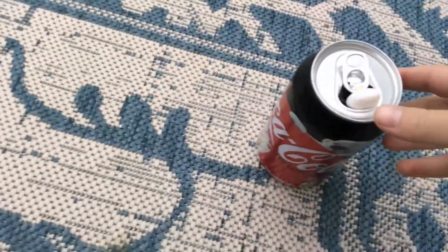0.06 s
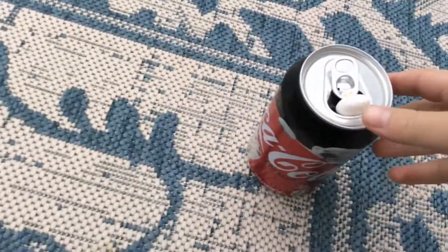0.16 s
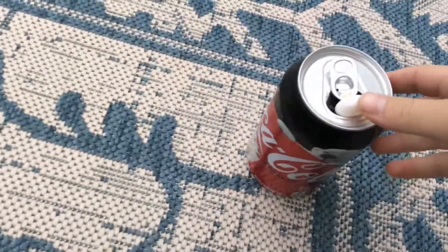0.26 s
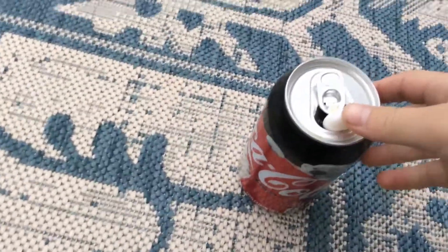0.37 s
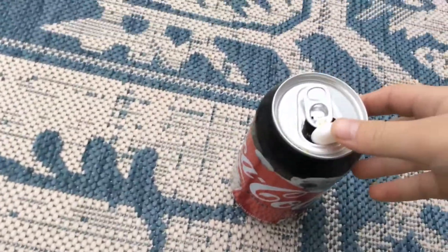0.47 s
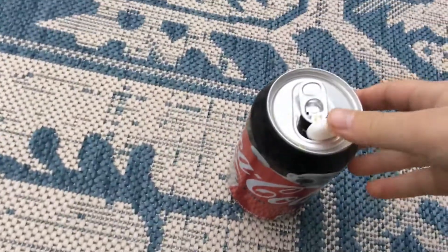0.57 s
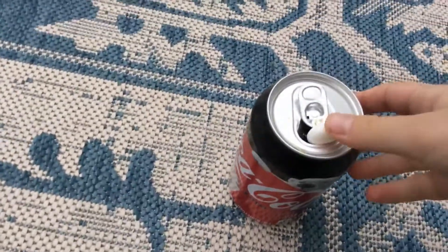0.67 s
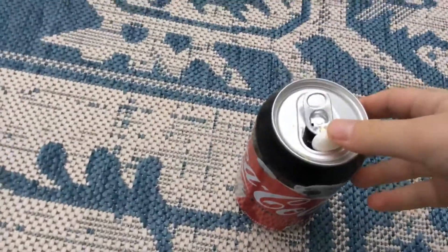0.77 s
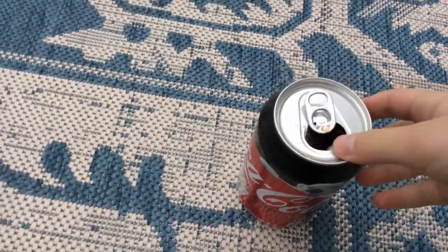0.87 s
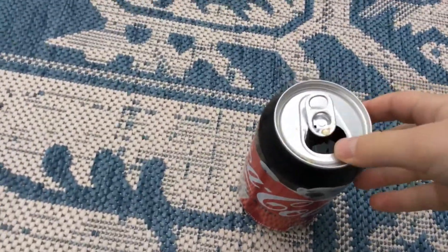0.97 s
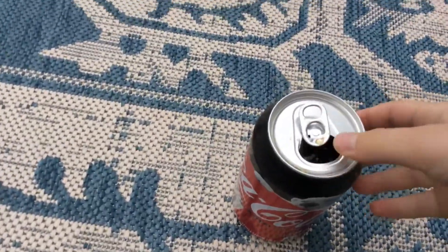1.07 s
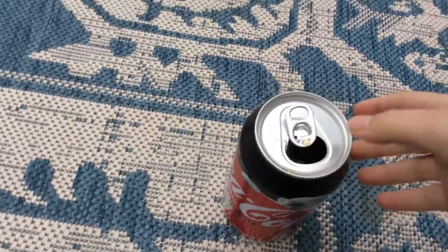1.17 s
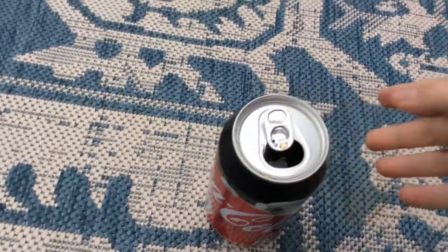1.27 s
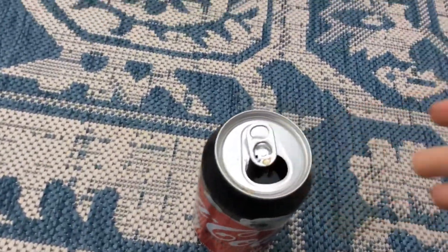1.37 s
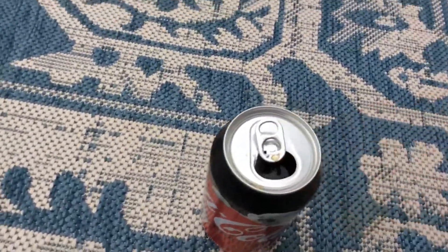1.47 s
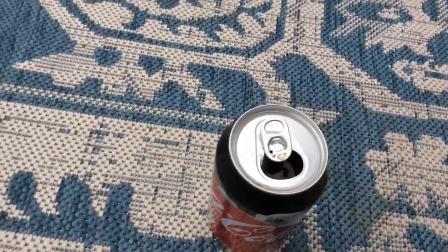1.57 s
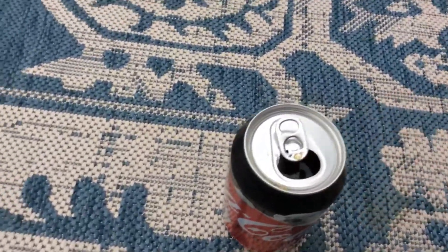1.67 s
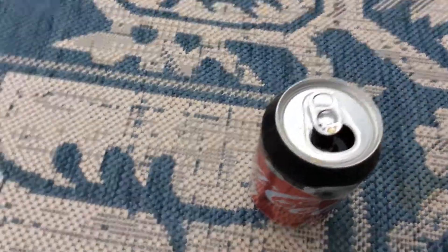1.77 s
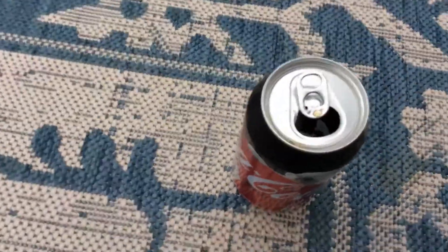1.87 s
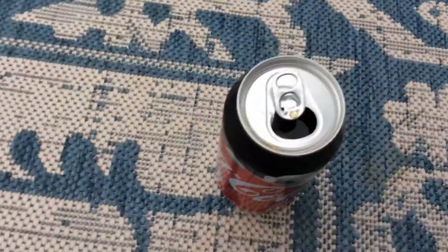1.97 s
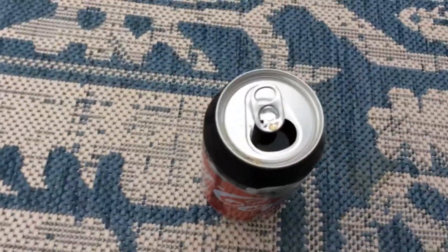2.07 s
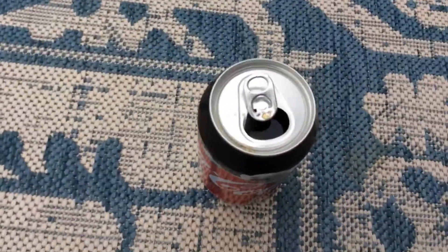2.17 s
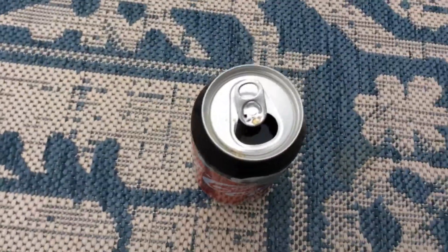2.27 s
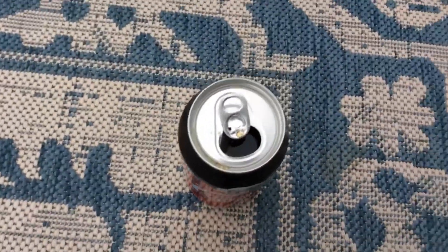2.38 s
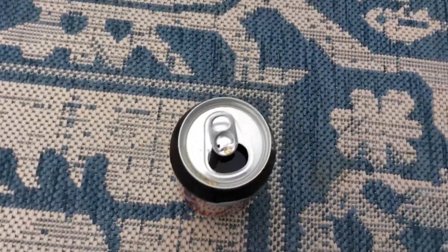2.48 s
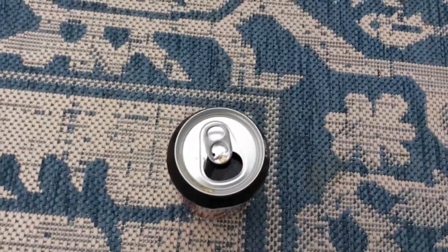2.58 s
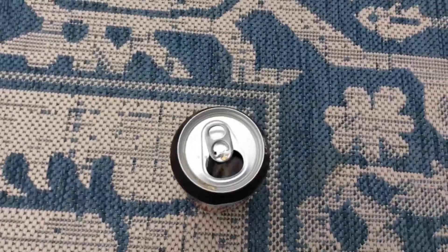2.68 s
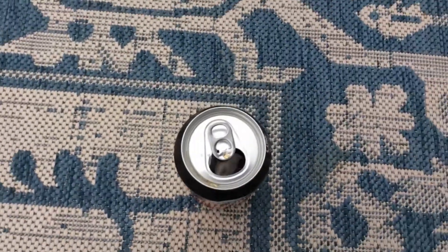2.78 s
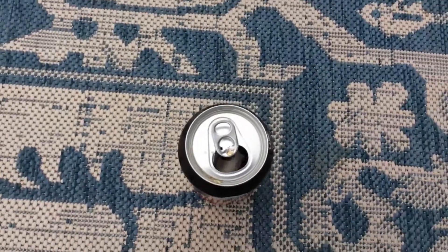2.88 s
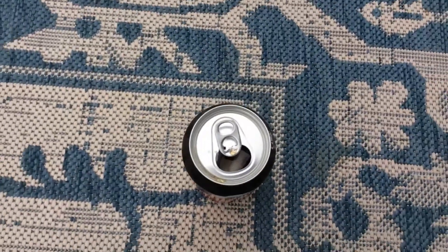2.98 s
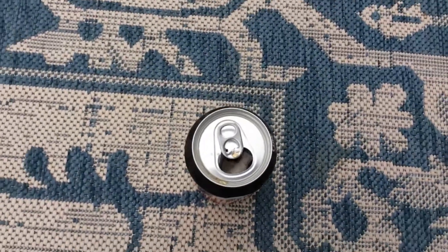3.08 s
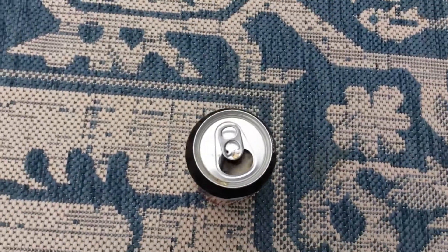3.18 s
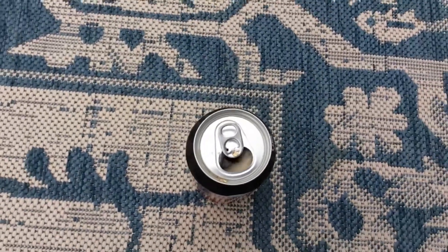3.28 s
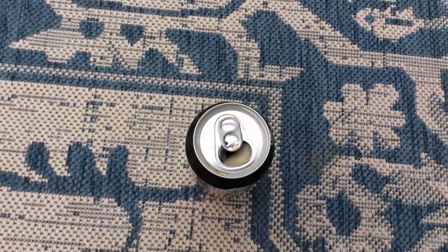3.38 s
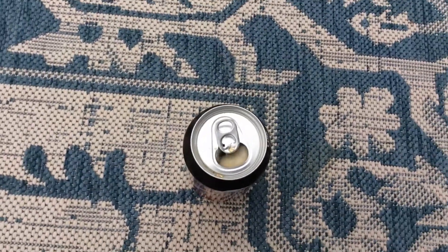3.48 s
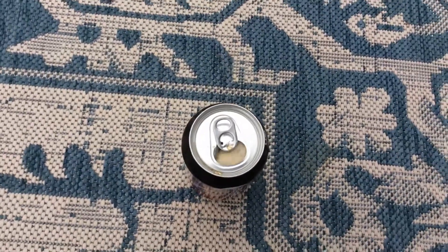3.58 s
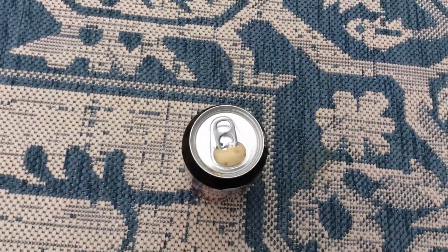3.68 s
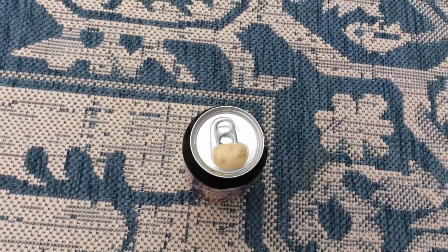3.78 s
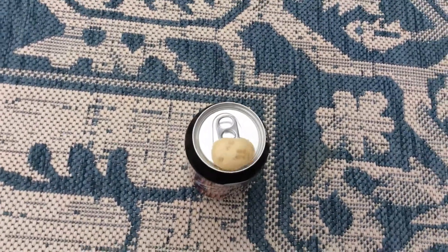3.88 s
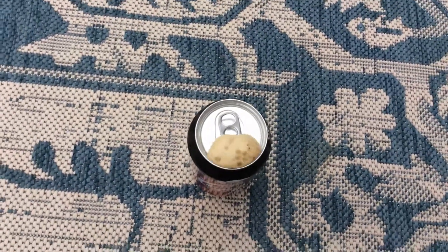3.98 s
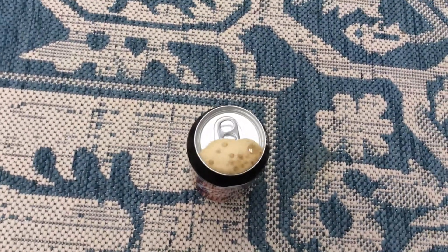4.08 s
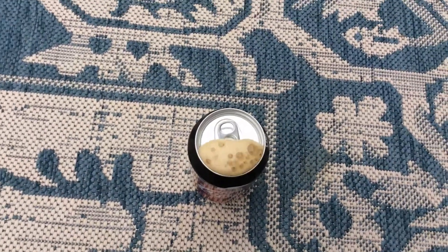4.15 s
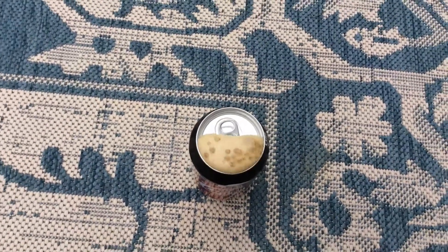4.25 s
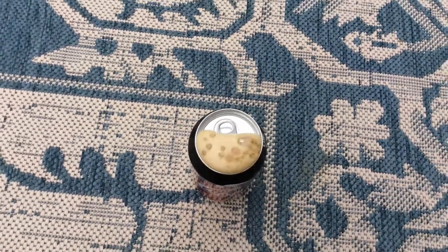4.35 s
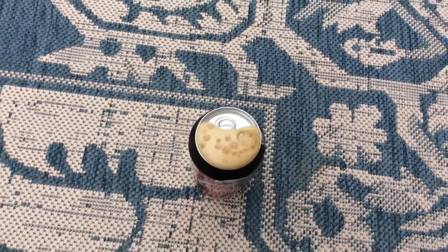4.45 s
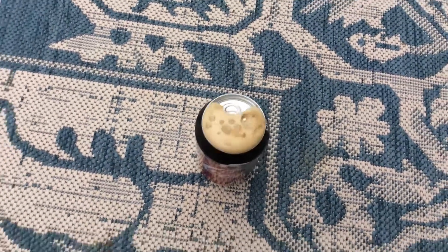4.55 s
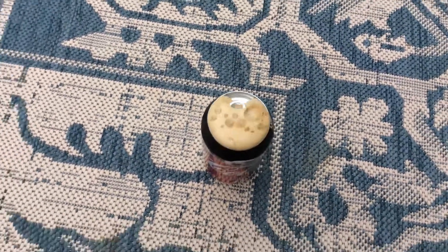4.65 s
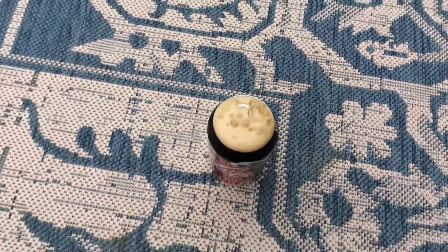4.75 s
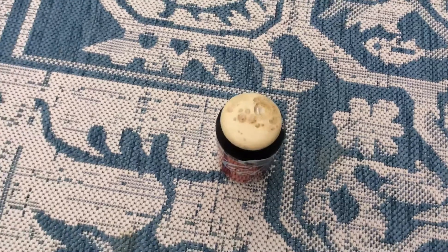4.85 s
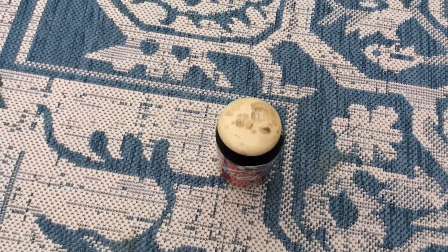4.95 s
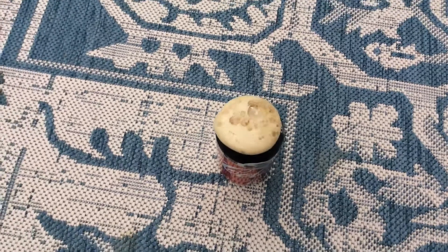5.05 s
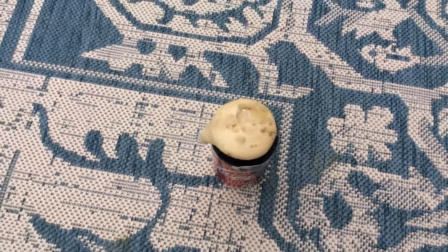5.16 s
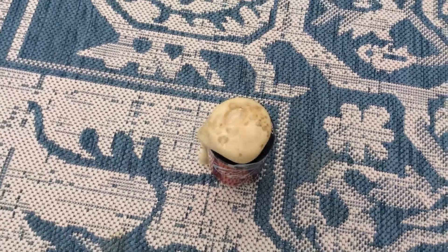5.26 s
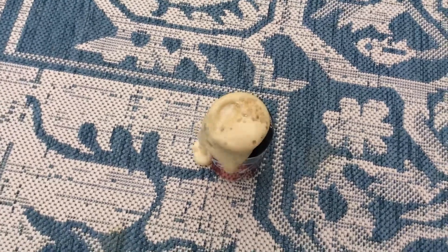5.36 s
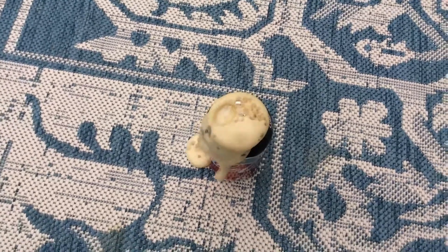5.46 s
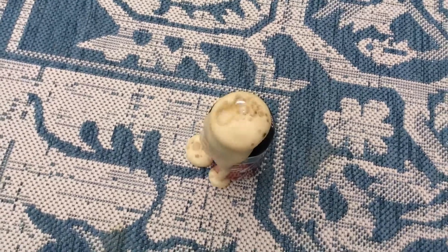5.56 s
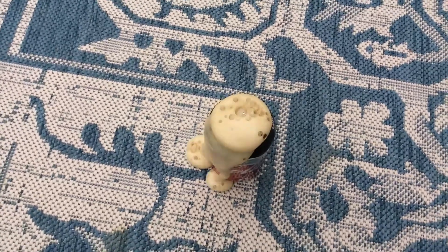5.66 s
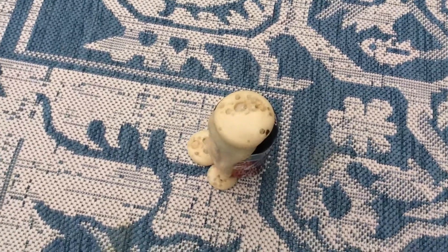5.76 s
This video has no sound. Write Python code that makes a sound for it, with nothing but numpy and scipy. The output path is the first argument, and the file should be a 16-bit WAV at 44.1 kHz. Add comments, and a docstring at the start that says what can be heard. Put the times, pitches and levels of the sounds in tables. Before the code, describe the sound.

Close mono pickup outdoors: low distant rumble with a faint hum, then a very brief scrape and bright aluminium crack, with a small splash and hollow plops. Two clear knocks and weaker bounces sound inside the filled can. A weak gush of tiny bubbles becomes dense crackling fizz, momentarily muffled, then open and strongest at the end. Soft rustles, bumps and a tiny bird chirp sit behind.

```python
"""A mint is pushed by thumb through the opening of a soda can: it scrapes, snaps past the lid and drops in.
Close by, it lands with a splash and plops, taps on the bottom; fizz builds in the can, then foam climbs out, hissing.
Cracks, taps and bumps are coloured bursts, with decaying sines for the can; the fizz is thousands of tiny pops.
Outdoors behind it: distant rumble and air, a faint hum and soft rustles, all shaped noise, soft low bumps,
and one bird chirp, a gliding sine. One microphone hears it all, through gain control and a band limit."""
import sys
import numpy as np
from scipy import signal
from scipy.fft import rfft, irfft
from scipy.io import wavfile
from scipy.ndimage import uniform_filter1d

SR = 44100
rng = np.random.default_rng(int(sys.argv[2]) if len(sys.argv) > 2 else 0)


def dump(signal):
    """Clip the signal to [-1, 1] and save it as 16-bit WAV at the path in sys.argv[1]."""
    limited = np.clip(np.atleast_2d(signal).T, -1, 1)
    pcm = np.round(limited * 32767).astype(np.int16)
    wavfile.write(sys.argv[1], SR, pcm)


N = 256838
TIME = np.arange(N) / SR  # seconds

# outdoor air, spectral shape: pitch_hz, density_db (relative, per Hz)
AIR_SHAPE = [(20, -26), (40, -10.5), (62, 1.5), (110, 0.5), (180, -1), (260, -10), (450, -19), (1050, -21),
             (1800, -26.5), (2800, -28.5), (4000, -26.5), (4800, -29), (7700, -31.5), (8250, -26),
             (10000, -36), (15500, -45)]
# swells of the distant rumble: peak_s, half_length_s, gain_db
RUMBLE_SWELLS = [(.23, 0.45, 4), (1.95, .12, 1.5), (2.497, 0.22, 4), (3.55, .18, 2), (5.582, 0.046, 5.5)]
# lines of a far machine's hum: pitch_hz, width_hz
HUM_LINES = [(169, 9), (619, 10), (727, 9), (1028, 22), (1238, 14)]
# level of each hum line before the swell: level_db
HUM_LINE_LEVELS = [-65.5, -83.5, -81, -79, -85.5]
# rise and fall of the whole hum: time_s, gain_db
HUM_SWELL_CURVE = [(0, -2.5), (1.5, -5.5), (2.4, 5), (4.4, 2.5), (5.8, -0.5)]
# brief rustles and spurts: start_s, length_s, level_db, centre_hz, width_octaves
RUSTLE_EVENTS = [(0.349, 0.15, -65.5, 3970, 0.17), (0.499, 0.02, -64, 5930, 0.18),
                 (2.21, 0.073, -59.5, 7940, 0.53), (2.81, 0.037, -62.5, 7900, 0.17),
                 (3.617, 0.053, -58, 8200, .25)]
# soft low bumps, the first three are dull thumps of the bottom taps:
# start_s, level_db, body_hz, width_octaves, t60_s
BUMP_EVENTS = [(1.414, -41.5, 540, 0.41, 0.028), (1.516, -50, 650, 0.54, .03), (1.586, -54.5, 520, .7, .04),
               (1.892, -52, 300, 1.03, 0.14), (2.227, -47, 700, 0.93, 0.023),
               (2.383, -51.5, 560, 0.32, .04), (2.426, -52.5, 520, 0.44, .035),
               (2.484, -52, 540, 0.51, 0.042), (2.905, -54, 1700, 1.5, 0.017),
               (5.356, -48, 600, 1.8, 0.027)]
# tiny high ticks: start_s, level_db, ring_hz, width_hz
TICK_EVENTS = [(0.896, -58.5, 7800, 2190), (1.053, -39, 9900, 1500), (1.0572, -42, 7000, 1500),
               (1.299, -50, 8130, 1390)]
# the mint slips past the rim and falls in, the last row is the landing's splash:
# start_s, level_db, brightness_db_per_octave, crack_t60_s
SLIP_EVENTS = [(0.9481, -29, 1.5, .035), (0.953, -26.5, -1, .03), (0.958, -17.5, 3.5, .02),
               (.9629, -9, 1.5, 0.017), (.966, -7.5, 3.5, 0.019), (.969, -19.5, 4, 0.016),
               (.9722, -17, -3.5, 0.026), (.982, -29, -2.5, 0.044), (.9965, -49, 4, .03),
               (1.0237, -33, -1, 0.063)]
# spectrum of the cracks and the splash: pitch_hz, level_db (relative)
CRACK_SHAPE = [(300, -48), (550, -35.5), (650, -22.5), (950, -13.5), (1200, -5.5), (2000, -6), (2800, -7),
               (4500, -7.5), (6800, -1.5), (8600, -3.5), (9300, -12.5), (11000, -10.5), (11600, -18),
               (15500, -26)]
# modes of the aluminium lid: pitch_hz, level_db (relative), t60_s
LID_MODES = [(1227, -12, 0.038), (1475, -4.5, 0.12), (1550, -1.5, 0.065), (1656, -9, 0.12),
             (1904, -4.5, .06), (2020, 2, 0.099), (2090, -5.5, 0.05), (2510, -4.5, 0.057),
             (3920, -9.5, 0.053), (4580, -12, 0.08), (5120, -14.5, 0.07), (5860, -2, 0.056),
             (6220, -6, .04), (6690, -0.5, .05), (6930, 6.5, 0.032), (7860, -6.5, .05), (7990, -2.5, 0.043),
             (8560, -5, .05), (8510, -6, .05), (8950, 1.5, 0.029), (9700, -11.5, .04), (10700, -6, 0.032)]
# the snap, then the landing, set the can's air ringing: start_s, level_db
AIR_PUFFS = [(0.9727, -35.5), (1.0245, -31.5)]
# modes of the air in the can: pitch_hz, level_db (relative), t60_s
CAN_AIR_MODES = [(1023, -23, 0.171), (1195, -14.5, .3), (1294, -7.5, 0.16), (1387, -8.5, 0.092),
                 (1506, -5.5, 0.15), (1525, -10, 0.14), (1638, -9, 0.13)]
# pockets of air dragged under by the mint: start_s, level_db, pitch_hz, t60_s
PLOP_EVENTS = [(1.0265, -24, 1550, 0.027), (1.034, -21.5, 1320, 0.027), (1.052, -32, 1284, 0.055),
               (1.113, -50, 1215, 0.23)]
# the sunken mint bounces on the bottom: start_s, level_db, t60_s, low_band_hz, low_boost_db,
# high_band_hz, high_boost_db, brightness_db_per_octave
BOUNCE_EVENTS = [(1.408, -27, 0.034, 1344, 5.5, 8550, 13, 0),
                 (1.464, -25.5, 0.022, 3140, 16, 6320, 12.5, 0.4),
                 (1.5078, -43, .02, 2900, 8, 6000, 7, 5.5),
                 (1.5143, -36.5, 0.037, 1430, 5, 7700, 10.5, -0.5),
                 (1.559, -47.5, 0.034, 2900, 5, 4320, 1, -1.5), (1.584, -55, 0.033, 1300, 4, 2900, -3, -8)]
# spectrum of a knock on the bottom: pitch_hz, level_db (relative)
KNOCK_SHAPE = [(200, -31), (500, -25), (830, -9), (1100, -2), (1600, 0.5), (2400, 0.5), (3700, -10.5),
               (5000, -14), (6000, -11.5), (7800, -15), (9500, -20), (10600, -12.5), (12000, -23),
               (15500, -26)]
# modes of the filled can's body: pitch_hz, level_db (relative), t60_s
BODY_MODES = [(976, -5.5, 0.075), (1223, -4.5, 0.08), (1295, -4, 0.083), (1495, -5.5, 0.085),
              (1820, -22, 0.048), (2450, -15, 0.05), (2840, -20, 0.052), (3200, -17, 0.054),
              (3380, -10, 0.039), (4030, -10, .04), (4780, -12, 0.051), (5500, -19, 0.049),
              (5800, -10, 0.03), (6740, -25, .05), (7460, -11, 0.046), (8059, -14, 0.045),
              (8260, -18, 0.058), (10700, -18, 0.029)]
# how far the foam is out of the can: time_s, share_0_to_1
FOAM_OUT = [(3.0, 0), (3.6, 0.23), (3.95, 0.24), (4.5, 0.75), (5.3, 0.9), (5.8, 0.81)]
# the first tiny bubbles give way to larger ones: time_s, share_0_to_1
BUBBLE_COARSENING = [(2.4, 0), (3.15, 0.62)]
# spectrum of the first tiny bubbles: pitch_hz, level_db (relative)
FIRST_BUBBLE_SHAPE = [(2000, -26), (3200, -18), (5000, 0), (8500, 6), (10500, 4), (13000, -3), (15500, -8)]
# spectrum of the fizz inside the can: pitch_hz, level_db (relative)
IN_CAN_SHAPE = [(700, -36), (1500, 0.5), (2050, -5), (2650, 5.5), (4700, -2.5), (7500, 0), (8700, 2.5),
                (9800, 0.5), (10700, -11), (12500, -15), (15500, -22)]
# spectrum of the foam in the open: pitch_hz, level_db (relative)
OPEN_FOAM_SHAPE = [(700, -28), (1500, -14), (2050, -19), (2700, -4), (4000, -1.5), (5600, 0.5), (7600, -2),
                   (9200, -3.5), (10500, -9), (12000, -14.5), (15500, -18)]
# resonances of the can top: pitch_hz, width_hz, boost_db
CAN_TOP_PEAKS = [(4050, 370, 4.5), (5510, 640, 4), (6920, 240, 4), (8200, 390, 3)]
# gain of the low part of the hiss, falling, then partly recovering: time_s, gain_db
LOW_HISS_GAIN = [(3.3, 4.5), (3.9, -0.5), (4.4, -1), (5.0, 0.5), (5.8, -0.5)]

# the rumble slowly ebbs and wavers by chance
RUMBLE_DB, RUMBLE_DB_PER_S, WAVER_DB, WAVER_S = -56.5, -0.47, 1.1, 0.14
AIR_DB = -61
PLOP_RISE_S = 0.0018
POPS_PER_S = 14000  # scaled by 0.15 to 1.15 as the fizz grows
# the fizz builds along an S-curve: its ceiling, time of half strength, time constant
FULL_DB, HALF_S, BUILD_S = -50, 3.534, 0.56
# a first weak gush of gas peaks soon after the mint first taps the bottom
GUSH_S, GUSH_DB, GUSH_LENGTH_S = 1.66, -71.5, 0.44
# foam plugs the opening and muffles the hiss until it pushes through
PLUG_S, PLUG_DB, PLUG_CLOSE_S, PLUG_CLEAR_S = 3.705, -6, 0.082, 0.19
# foam spills over the rim and its bursting surface grows
SPILL_S, SPILL_DB_PER_S = 5.2, 4.5
# the bird's note rises fast and levels off towards its top pitch
CHIRP_S, CHIRP_LENGTH_S, CHIRP_DB = 3.534, 0.048, -51
CHIRP_FROM_HZ, CHIRP_TOP_HZ, CHIRP_GLIDE_S = 5600, 7700, 0.018
# gain control: threshold, dB of ducking per dB over it, recovery, smoothing time
DUCK_ABOVE_DB, DUCK_SLOPE, RECOVER_DB_PER_S, DUCK_ATTACK_S = -25, 0.2, 12, 0.07
EDGE_HZ = 15750  # upper band limit


def amp(db):
    """Turns dB into gain."""
    return 10 ** (np.asarray(db) / 20)


def unit(x):
    """Scales to rms 1."""
    return x / np.sqrt(np.mean(x ** 2) + 1e-24)


def curve(rows):
    """Joins rows of time_s, value by straight lines."""
    return np.interp(TIME, *np.transpose(rows))


def spectrum(points, hz):
    """Joins points of pitch_hz, level_db on a log-frequency axis."""
    point_hz, db = np.transpose(points)
    return np.interp(np.log(hz + 1), np.log(point_hz), db)


def bins(x):
    """Gives the frequencies of a sound's spectrum, in Hz."""
    return np.fft.rfftfreq(len(x), 1 / SR)


def hump(hz, centre, width):
    """A resonance curve of height 1."""
    return 1 / (1 + (2 * (hz - centre) / width) ** 2)


def bell(hz, centre_hz, octaves):
    """A soft band, in dB."""
    return -20 * np.log10(1 + (np.log2((hz + 1) / centre_hz) / octaves) ** 2)


def swell(s, rise, fall):
    """A smooth bump of height 1 that peaks at time s."""
    return np.exp(-((TIME - s) / np.where(TIME < s, rise, fall)) ** 2)


def colour(x, db):
    """Filters by a gain in dB for each frequency, then scales to rms 1."""
    return unit(irfft(rfft(x) * amp(db), len(x)))


def add(mix, s, sound):
    """Mixes a sound in at time s."""
    part = mix[max(round(s * SR), 0):][:len(sound)]
    part += sound[:len(part)]


def ring(modes, t):
    """Sums the damped sines of one struck object, with alternating sign."""
    total = 0
    for k, (hz, db, t60) in enumerate(modes):
        total = total + (-1) ** k * amp(db - 60 * t / t60) * np.sin(2 * np.pi * hz * t)
    return total


def burst(shape, t60, tail_db, tail_t60, click, size=8192):
    """A contact click, a dense dying cloud and a weak tail of reflections, in a causal colour (Hz -> dB)."""
    t, hz = np.arange(size) / SR, np.fft.rfftfreq(size, 1 / SR)
    gain = unit(amp(shape(hz)))
    # minimum phase, so that nothing sounds before the contact
    log_gain = np.log(np.r_[gain, gain[-2:0:-1]] + 1e-5)
    response = np.exp(np.conj(signal.hilbert(log_gain)))[:len(hz)]
    decay = amp(-60 * t / t60) + amp(tail_db - 60 * t / tail_t60)
    cloud = rng.choice([-1., 1.], size) * decay
    rms = cloud.std()
    cloud[0] = click * np.linalg.norm(cloud)
    return rms * unit(irfft(rfft(cloud) * response, size))


def rumble_level():
    """The distant rumble's level in dB: a slow ebb, a few swells and a random waver."""
    waver = colour(rng.standard_normal(N), -40 * np.log10(1 + (bins(TIME) * WAVER_S) ** 2))
    swells = sum(db * swell(s, length, length) for s, length, db in RUMBLE_SWELLS)
    return RUMBLE_DB + RUMBLE_DB_PER_S * TIME + swells + WAVER_DB * waver


def outdoors(split_hz=260):
    """Far rumble below steady air, both shaped noise; narrow noise lines make the wavering machine hum."""
    hz = bins(TIME)
    air_db, low_share = spectrum(AIR_SHAPE, hz), 1 / (1 + (hz / split_hz) ** 8)
    rumble = colour(rng.standard_normal(N), air_db + 10 * np.log10(low_share + 1e-12))
    air = colour(rng.standard_normal(N), air_db + 10 * np.log10(1 - low_share + 1e-12))
    hum = np.zeros(N)
    for (centre, width), db in zip(HUM_LINES, HUM_LINE_LEVELS):
        line_db = 20 * np.log10(hump(hz, centre, width))
        hum += amp(db) * colour(rng.standard_normal(N), line_db)
    return rumble * amp(rumble_level()) + amp(AIR_DB) * air + hum * amp(curve(HUM_SWELL_CURVE))


def rustles():
    """Short soft noise bands that swell and fade."""
    out = np.zeros(N)
    for s, length, db, centre_hz, octaves in RUSTLE_EVENTS:
        noise = rng.standard_normal(SR // 4)
        noise = colour(noise, bell(bins(noise), centre_hz, octaves))[:int(length * SR)]
        add(out, s, amp(db) * noise * np.hanning(len(noise)))
    return out


def ticks():
    """Small clicks, each with one high resonance."""
    out = np.zeros(N)
    for s, db, centre_hz, width in TICK_EVENTS:
        shape = lambda hz: 14 * np.log10(hump(hz, centre_hz, width))
        add(out, s, amp(db) * burst(shape, t60=0.019, tail_db=-27.0, tail_t60=.08, click=0.46))
    return out


def mint(lid_db=-12, lid_colour_db=5, lid_width_hz=170, tail_db=-29, tail_t60=0.135, click=0.35, most_lean_db=6):
    """Each slip cracks and rings the lid, the last row is the landing's splash, made alike; puffs ring the can's air."""
    out, t = np.zeros(N), np.arange(SR // 2) / SR

    def colouring(hz):
        lid_peaks = np.max([hump(hz, mode[0], lid_width_hz) for mode in LID_MODES], axis=0)
        return spectrum(CRACK_SHAPE, hz) + lid_colour_db * lid_peaks

    for s, db, tilt, t60 in SLIP_EVENTS:
        lean = lambda hz: np.minimum(tilt * np.log2((hz + 1) / 5000), most_lean_db)
        crack = burst(lambda hz: colouring(hz) + lean(hz), t60, tail_db, tail_t60, click)
        lid = ring([(hz, level + lean(hz), decay) for hz, level, decay in LID_MODES], t)
        add(out, s, amp(db) * crack)
        add(out, s, amp(db + lid_db) * lid / np.sqrt(2))
    for s, db in AIR_PUFFS:
        add(out, s, amp(db) * ring(CAN_AIR_MODES, t))
    return out


def plops():
    """A trapped bubble swells into a short damped tone."""
    out, t = np.zeros(N), np.arange(SR // 8) / SR
    for s, db, hz, t60 in PLOP_EVENTS:
        add(out, s, ring([(hz, db, t60)], t) * (1 - np.exp(-t / PLOP_RISE_S)))
    return out


def bounces(body_db=-11, tail_db=-22, tail_t60=0.17, low_width_hz=850, high_width_hz=1150, click=0.55):
    """Each bounce strikes another spot of the bottom and so favours other modes of the body."""
    out, t = np.zeros(N), np.arange(SR // 4) / SR
    band = lambda hz, centre, width: 1 / (1 + (2 * (hz - centre) / width) ** 4)
    for s, db, t60, low_hz, low_db, high_hz, high_db, tilt in BOUNCE_EVENTS:
        def favour(hz):
            low = low_db * band(hz, low_hz, low_width_hz)
            high = high_db * band(hz, high_hz, high_width_hz)
            return tilt * np.log2((hz + 1) / 2000) + low + high

        knock = burst(lambda hz: spectrum(KNOCK_SHAPE, hz) + favour(hz), t60, tail_db, tail_t60, click)
        body = ring([(hz, level + favour(hz), decay) for hz, level, decay in BODY_MODES], t)
        add(out, s, amp(db) * knock)
        add(out, s, amp(db + body_db) * body)
    return out


def bumps():
    """Band-shaped dull bursts: thumps of the bottom taps, then soft bumps."""
    out = np.zeros(N)
    for s, db, body_hz, octaves, t60 in BUMP_EVENTS:
        shape = lambda hz: bell(hz, body_hz, octaves)
        add(out, s, amp(db) * burst(shape, t60, tail_db=-20.0, tail_t60=0.11, click=0.77))
    return out


def fizz_strength():
    """A first gush, then a build-up, choked while foam plugs the opening and lifted when it spills."""
    build = amp(FULL_DB) / (1 + np.exp((HALF_S - TIME) / BUILD_S))
    gush = amp(GUSH_DB) * swell(GUSH_S, GUSH_LENGTH_S, GUSH_LENGTH_S)
    plug_db = PLUG_DB * swell(PLUG_S, PLUG_CLOSE_S, PLUG_CLEAR_S)
    spill_db = SPILL_DB_PER_S * np.maximum(TIME - SPILL_S, 0)
    after_first_bounce = TIME > BOUNCE_EVENTS[0][0]
    return (gush + build * amp(plug_db + spill_db)) * after_first_bounce


def clusters(x, depth_db):
    """Bubbles of like size burst together: brief patches in time and pitch."""
    z = signal.stft(x, nperseg=256, noverlap=192)[2]
    patches = uniform_filter1d(rng.standard_normal(z.shape), size=4, axis=0)  # across pitch
    patches = unit(uniform_filter1d(patches, size=20, axis=1))  # across time
    return signal.istft(z * amp(depth_db * patches), nperseg=256, noverlap=192)[1][:N]


def fizz(size_spread_db=1.5, low_part_hz=4800):
    """Thousands of bubbles burst each second, more as the fizz grows; their colour opens as foam leaves the can."""
    strength = fizz_strength()
    rate = POPS_PER_S * (.15 + strength / strength.max())
    sizes = amp(size_spread_db * np.minimum(rng.exponential(1, N), 4))
    happens = rng.random(N) < rate / SR
    pops = sizes * rng.choice([-1., 1.], N) * happens / np.sqrt(rate)  # even power at any rate
    hz = bins(pops)
    top_db = sum(db * hump(hz, centre, width) for centre, width, db in CAN_TOP_PEAKS)
    first = colour(pops, spectrum(FIRST_BUBBLE_SHAPE, hz) + top_db)
    inside = colour(pops, spectrum(IN_CAN_SHAPE, hz) + top_db)
    outside = colour(pops, spectrum(OPEN_FOAM_SHAPE, hz) + top_db)
    coarse, foam = np.clip(curve(BUBBLE_COARSENING), 0, 1), np.clip(curve(FOAM_OUT), 0, 1)
    hiss = (1 - foam) * ((1 - coarse) * first + coarse * inside) + foam * outside
    low_part = irfft(rfft(hiss) / (1 + (hz / low_part_hz) ** 8), N)
    hiss = hiss + (amp(curve(LOW_HISS_GAIN)) - 1) * low_part
    return clusters(hiss, depth_db=1.3) * strength


def bird():
    """One thin rising chirp: a gliding sine under an arched envelope."""
    out, t = np.zeros(N), np.arange(0, CHIRP_LENGTH_S, 1 / SR)
    hz = CHIRP_TOP_HZ + (CHIRP_FROM_HZ - CHIRP_TOP_HZ) * np.exp(-t / CHIRP_GLIDE_S)
    arch = np.sin(np.pi * t / CHIRP_LENGTH_S)
    note = np.sin(2 * np.pi * np.cumsum(hz) / SR)
    add(out, CHIRP_S, amp(CHIRP_DB) * np.sqrt(2) * arch * note)
    return out


def scene():
    """Sums all sources, near and far, at one microphone."""
    background = outdoors() + rustles() + bird()
    close = ticks() + mint() + plops() + bounces() + bumps() + fizz()
    return (background + close)[None]


def gain_control(x):
    """A loud sound turns the gain down a little; it creeps back up."""
    power_db = 10 * np.log10(abs(uniform_filter1d(x ** 2, size=400)) + 1e-12)
    over_db = DUCK_SLOPE * np.maximum(power_db - DUCK_ABOVE_DB, 0)
    recovery = RECOVER_DB_PER_S * TIME
    held_db = np.maximum.accumulate(over_db + recovery) - recovery  # falls back at a steady rate
    keep = np.exp(-1 / (DUCK_ATTACK_S * SR))
    return amp(-signal.lfilter([1 - keep], [1, -keep], held_db))


def record(dry):
    """Applies gain control, a full-scale ceiling, then the band limit."""
    wet = np.clip(dry * gain_control(dry[0]), -1, 1)
    lowpass = signal.firwin(511, EDGE_HZ, window=("kaiser", 9), fs=SR)
    return signal.oaconvolve(wet, lowpass[None], "same")


dry = scene()
out = record(dry)
dump(out)
```